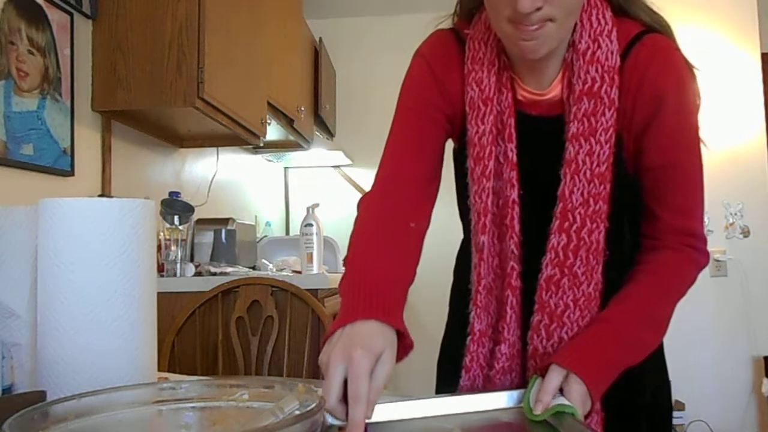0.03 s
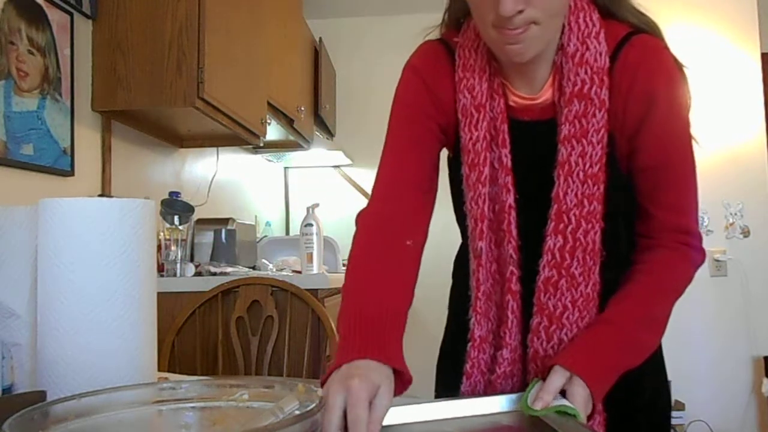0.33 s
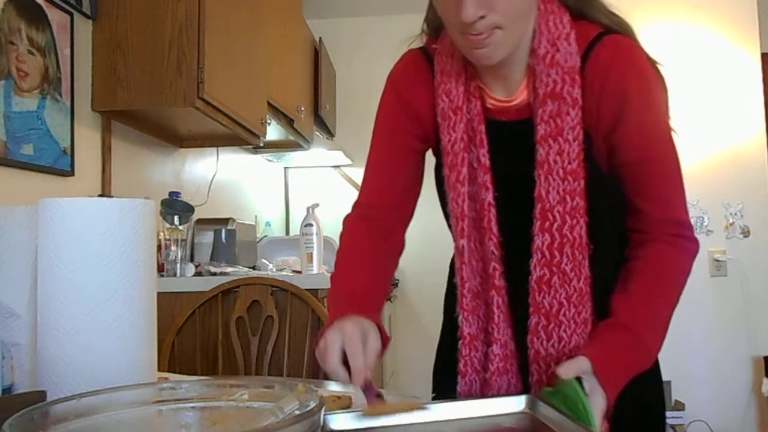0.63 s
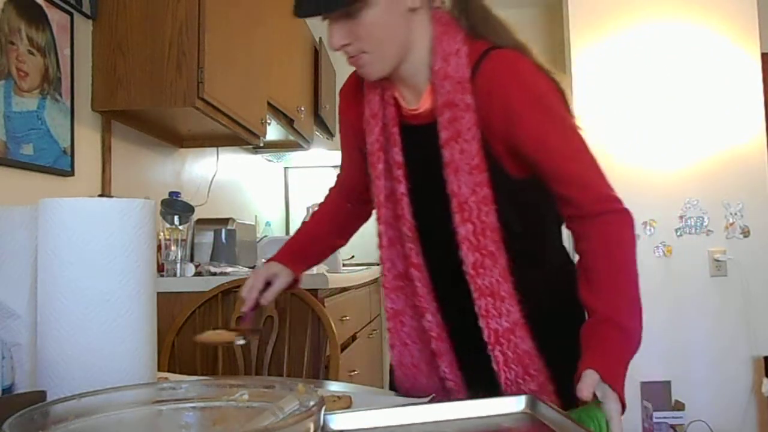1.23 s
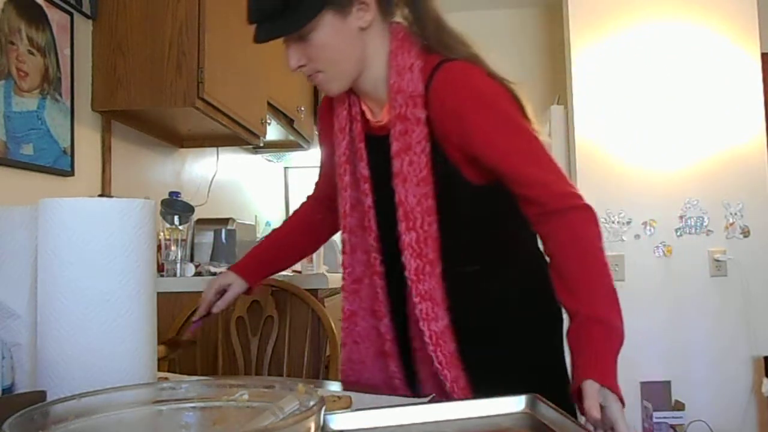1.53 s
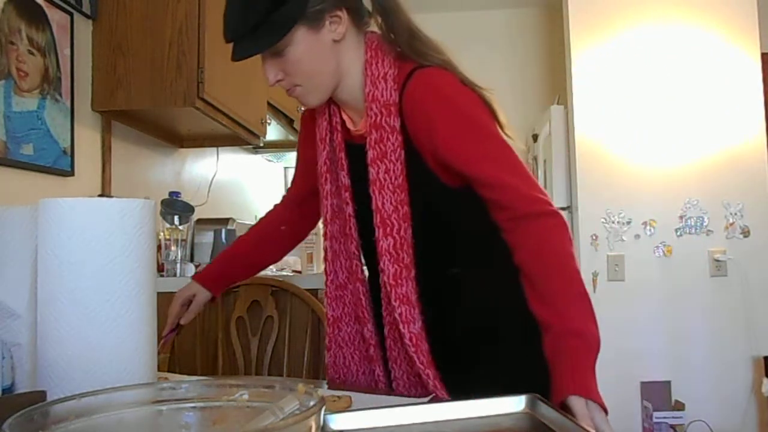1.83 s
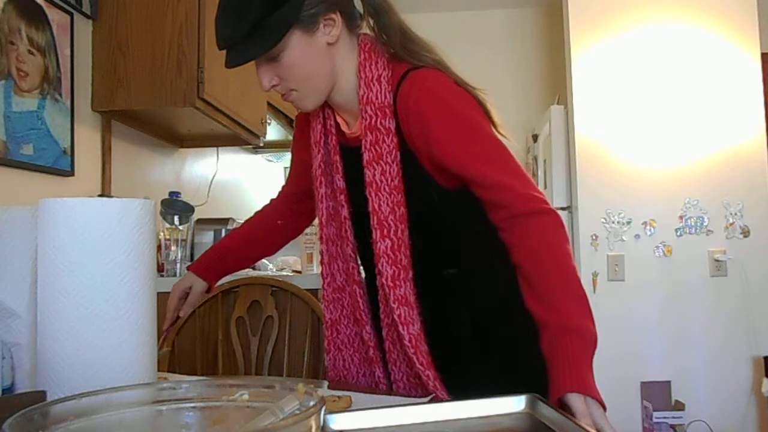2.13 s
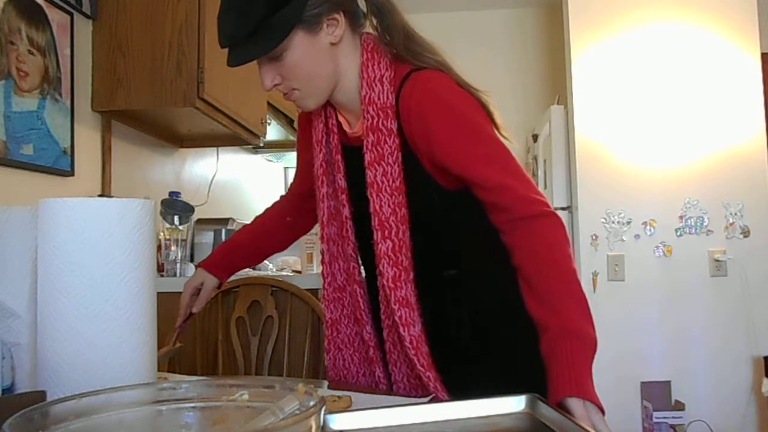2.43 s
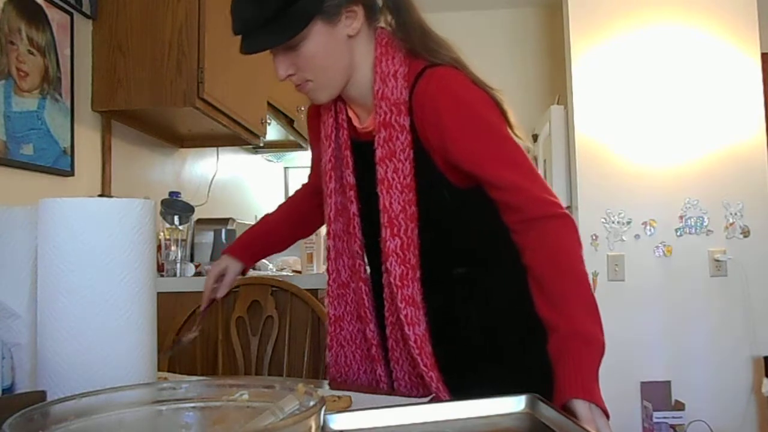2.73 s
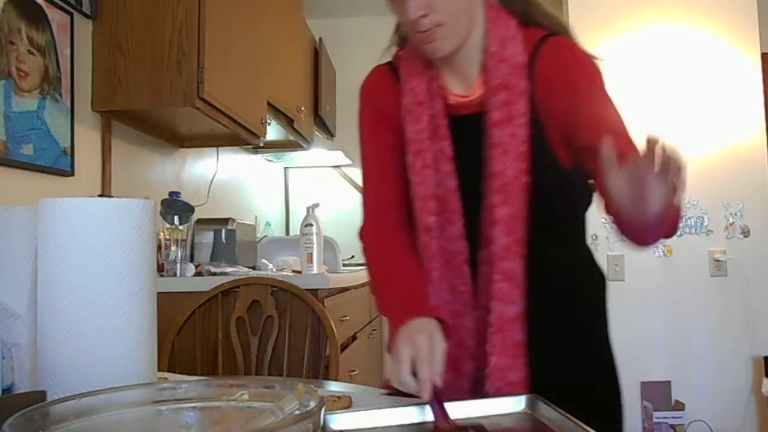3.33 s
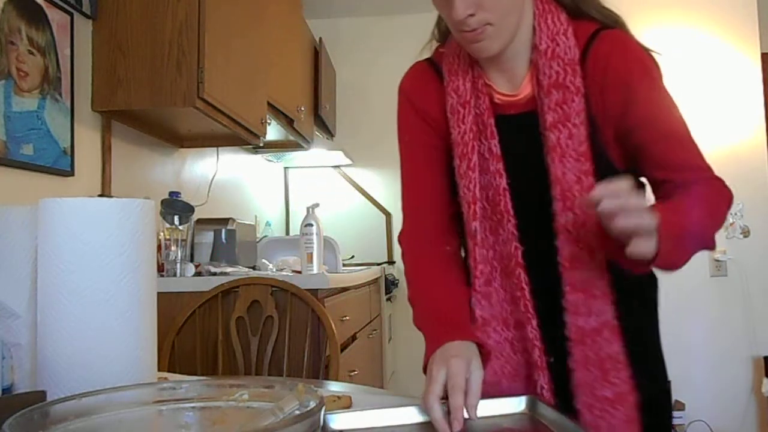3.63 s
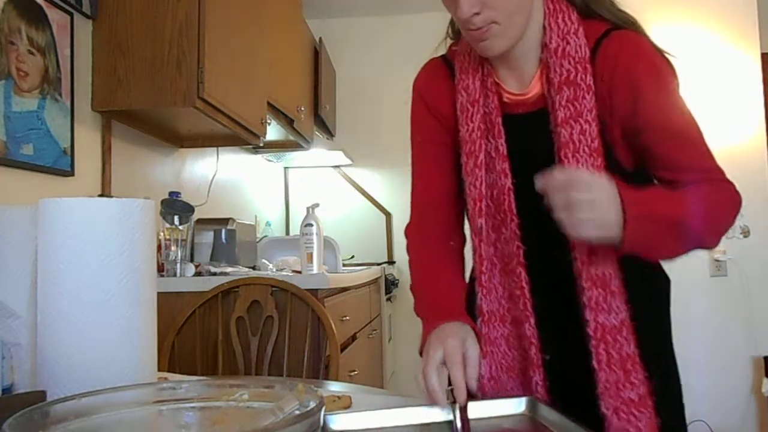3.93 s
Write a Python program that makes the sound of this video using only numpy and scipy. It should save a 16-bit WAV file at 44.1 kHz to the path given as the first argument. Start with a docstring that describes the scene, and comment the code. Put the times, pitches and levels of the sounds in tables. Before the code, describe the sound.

A spatula scrapes softly on a metal baking tray. A cookie slides off faintly and the blade ticks, then the tray bangs, clatters and is scraped again. A fridge hums low in the small kitchen.

```python
"""Spatula on a baking tray

A spatula scrapes under a cookie on a metal tray in tiny stick-slips. A little way off the cookie
slides from the blade, which ticks lightly. Then the spatula bangs down: the tray rings, thumps on
the table, clatters on its rim and is scraped again. The small kitchen rings briefly after each
contact; a fridge hums throughout."""
import sys
import numpy as np
from scipy import signal
from scipy.fft import rfft, irfft
from scipy.io import wavfile
from scipy.ndimage import uniform_filter1d

SR = 44100
rng = np.random.default_rng(int(sys.argv[2]) if len(sys.argv) > 2 else 0)


def waveform_to_disk(signal):
    """Save audio, clipped to [-1, 1], as 16-bit WAV at the path in sys.argv[1]."""
    frames = np.transpose(np.atleast_2d(signal))
    scaled = np.clip(frames, -1, 1) * 32767
    samples = np.round(scaled).astype(np.int16)
    wavfile.write(sys.argv[1], SR, samples)


N = 176400
ROOM_T60_S, SLIPS_PER_S = 0.39, 3500


def undb(db):
    """Decibels to gain."""
    return 10 ** (np.asarray(db) / 20)


def unit(x):
    """Scale to rms 1."""
    return x / np.sqrt(np.mean(x ** 2))


def fade(t60_s):
    """Exponential decay, one second long."""
    return np.exp(-np.log(1000) * np.arange(SR) / SR / t60_s)


def colour(x, points):
    """Minimum-phase filter of unit power through (Hz, dB) points."""
    hz, db = np.array(points).T
    size = 2 * len(x)
    bins_hz = np.maximum(np.arange(len(x) + 1) * SR / size, 1)
    gain = unit(undb(np.interp(np.log(bins_hz), np.log(np.sort(hz)), db)))
    cepstrum = irfft(np.log(gain))
    cepstrum[1:len(x)] *= 2
    cepstrum[len(x) + 1:] = 0
    return irfft(rfft(x, size) * np.exp(rfft(cepstrum)))[:len(x)]


def wander(rate_hz):
    """Smooth random drift, rms 1."""
    hold = int(SR / rate_hz)
    steps = np.repeat(rng.standard_normal(N // hold + 1), hold)
    return unit(uniform_filter1d(uniform_filter1d(steps, hold), hold)[:N])


def envelope(points):
    """Gain along (s, dB) points, silent outside them."""
    times_s, db = np.array(points).T
    return undb(np.interp(np.arange(N) / SR, times_s, db, left=-200, right=-200))


def add(out, start_s, x):
    """Mix x into out."""
    i = int(start_s * SR)
    out[i:i + len(x)] += x[:N - i]


def ring(modes, db_per_octave=0):
    """Decaying modes that start from rest, neighbours opposed; rms 1 at the start."""
    hz, db, t60_s = np.array(modes).T
    gains = undb(db + db_per_octave * np.log2(hz))
    gains /= np.sqrt(np.sum(gains ** 2) / 2)
    t = np.arange(SR) / SR
    return sum((-1) ** k * gain * np.sin(2 * np.pi * hz[k] * t) * fade(t60_s[k])
               for k, gain in enumerate(gains))


def struck_sheet(points, t60_s, crack_db, room_db):
    """Sheet metal's response to a blow: a crack, crowded short modes and the kitchen's tail."""
    crack = undb(crack_db) * fade(0.0097)
    room = undb(room_db) * fade(ROOM_T60_S) * (1 - fade(0.048))
    shape = np.sqrt(fade(t60_s) ** 2 + crack ** 2 + room ** 2)
    return colour(rng.standard_normal(SR) * shape, points)


def slip_response(points, t60_s, direct_db, room_db):
    """One tiny slip: its own click, the metal's short ring and the kitchen's tail."""
    response = rng.standard_normal(SR) * np.hypot(fade(t60_s), undb(room_db) * fade(ROOM_T60_S))
    response[0] += undb(direct_db) * np.sqrt(np.sum(response ** 2))
    return colour(response, points)


def rub(force, body, per_s, spread_db):
    """Random stick-slip clicks, sized by the force, drive a body."""
    clicks = (rng.random(N) < per_s / SR) * rng.choice([-1, 1], N)
    sizes = undb(spread_db * np.clip(rng.standard_normal(N), -2, 2))
    return signal.fftconvolve(unit(clicks * sizes) * force, body / np.sqrt(np.sum(body ** 2)))[:N]


# Fridge and mains tones. Each row: frequency in Hz, rms level in dB, waver as a ratio.
HUM_TONES = [(59, -57.5, 0.38), (163, -69.5, 0.88), (325, -59.5, 0.22), (361.3, -63.5, 0.44),
             (496, -65.5, 1), (726, -72.5, 0.22), (4530, -81.5, .3)]
# Air spectrum. Each row: frequency in Hz, relative level in dB.
AIR_COLOUR = [(10, -15.5), (20, 1), (30, -1), (42, -16.5), (58, -7.5), (76, -14.5), (150, -11.5),
              (190, -16), (228, -4.5), (290, -10.5), (350, -8), (420, -12), (520, -12), (630, -20),
              (850, -19), (1640, -26.5), (2300, -28.5), (2870, -29), (3600, -31), (4500, -31.5),
              (6000, -32.5), (9400, -35), (12400, -40)]


def fridge_and_air():
    """A fridge's wavering hum over a steady rush of air."""
    t = np.arange(N) / SR
    hum = np.zeros(N)
    for hz, db, waver in HUM_TONES:
        drift = 1 + waver * (wander(9) + 1j * wander(9))
        tone = np.real(drift * np.exp(2j * np.pi * hz * t))
        hum += undb(db) * np.sqrt(2 / (1 + 2 * waver ** 2)) * tone
    return hum + undb(-52) * colour(rng.standard_normal(N), AIR_COLOUR)


# Two pushes of the blade. Each row: time in seconds, level in dB.
FIRST_PUSH = [(0, -35), (.03, -40), (.058, -37.5), (.1, -42.5), (.145, -41.5), (.165, -41), (.174, -34.5),
              (.202, -35.5), (.214, -51), (.24, -49), (.262, -40), (.29, -61), (.39, -61.5), (.416, -50),
              (.44, -70)]
SECOND_PUSH = [(3.76, -53), (3.766, -42.5), (3.8, -41), (3.9, -50), (3.94, -45), (3.965, -69), (4, -66)]
# Blade contact spectrum. Each row: frequency in Hz, relative level in dB.
BLADE_COLOUR = [(240, -31), (400, -15), (750, -13.5), (950, -6), (1250, -8.5), (1420, -10), (1800, -7),
                (1980, -0.5), (2700, -2.5), (3600, -0.5), (4200, -3), (4800, -5.5), (6500, -7), (9300, -8),
                (10500, -12.5), (12400, -17)]
# Tray floor resonances. Each row: frequency in Hz, relative level in dB, T60 in seconds.
FLOOR_MODES = [(1190, -8, .3), (1292, -7, .38), (1820, -6, .22), (1991, 3, .22), (2204, -1, .26),
               (3183, -7, .3), (3453, -2, .26), (5211, -5, .17), (6163, -7, .22), (6874, -7, .22),
               (7432, -7, .22), (8410, -5, .2)]


def spatula_scrape():
    """The blade grates over baked crumbs; the tray rings faintly under it."""
    body = slip_response(BLADE_COLOUR, t60_s=0.074, direct_db=-0.5, room_db=-10)
    body += undb(-17) * ring(FLOOR_MODES)
    return rub(envelope(FIRST_PUSH) + envelope(SECOND_PUSH), body, SLIPS_PER_S, spread_db=4.5)


# Cookie friction. Each row: time in seconds, level in dB.
SLIDE_FORCE = [(.95, -72), (1.15, -64), (1.27, -67.5), (1.4, -80)]
# Slide spectrum. Each row: frequency in Hz, relative level in dB.
SLIDE_COLOUR = [(1000, -25), (2300, -8), (2950, 5), (3700, -9), (4400, 4), (4900, -12), (5800, -1),
                (9500, -17)]


def cookie_slide():
    """The cookie slips off the blade, farther away."""
    body = slip_response(SLIDE_COLOUR, t60_s=0.1, direct_db=-7, room_db=-6)
    return rub(envelope(SLIDE_FORCE), body, SLIPS_PER_S, spread_db=6)


# Blade taps. Each row: start in seconds, level in dB, tilt in dB per octave.
TICKS = [(1.93, -63, 1), (2.445, -60.5, 5), (2.508, -57.5, 0), (2.661, -54, 2)]
# Blade resonances. Each row: frequency in Hz, relative level in dB, T60 in seconds.
BLADE_MODES = [(2830, 6, .25), (3700, -3, .3), (4570, -1, .3), (4930, -3, .2), (6155, -7, .45),
               (6930, -4, .2), (7130, -5, .25), (7680, -13, .7), (9150, -10, .2)]


def blade_ticks():
    """Light contacts set the blade ringing."""
    out = np.zeros(N)
    for start_s, db, db_per_octave in TICKS:
        contact = undb(-3) * struck_sheet(BLADE_COLOUR, t60_s=0.1, crack_db=0, room_db=-10)
        add(out, start_s, undb(db) * (contact + ring(BLADE_MODES, db_per_octave)))
    return out


# Blows on the tray floor. Each row: start in seconds, level in dB.
BANGS = [(3.5507, -22.5), (3.5515, -18), (3.5575, -23.5)]
# Bang spectrum. Each row: frequency in Hz, relative level in dB.
BANG_COLOUR = [(80, -23), (130, -6), (240, -4.5), (360, -13), (520, -11), (780, -6), (1000, -10.5),
               (1250, -5), (1400, -11), (1600, -4.5), (1750, -13), (2020, 1.5), (2650, -6.5), (3150, 0),
               (3800, -4.5), (4600, -2.5), (5200, -6), (6500, -6), (8700, -6.5), (10300, -11), (12400, -18)]
# Tray-on-table resonances. Each row: frequency in Hz, relative level in dB, T60 in seconds.
THUMP_MODES = [(132.6, 0.5, 0.58), (151.4, -3, 0.18), (195, -9.5, 0.12), (223.5, 0, 0.17), (253.4, 1, 0.24),
               (318, -14, 0.39)]


def tray_bang():
    """Blade and tray land in quick contacts; the tray thumps on the table."""
    out = np.zeros(N)
    for start_s, db in BANGS:
        add(out, start_s, undb(db) * struck_sheet(BANG_COLOUR, t60_s=0.12, crack_db=3, room_db=-5))
    add(out, BANGS[0][0], undb(-21.5) * ring(FLOOR_MODES) + undb(-30.5) * ring(THUMP_MODES))
    return out


# Rim blows. Each row: start in seconds, level in dB.
KNOCKS = [(3.76, -40.5), (3.7817, -17.5), (3.787, -29.5), (3.8144, -19), (3.828, -28.5), (3.837, -29.5),
          (3.8586, -33), (3.891, -34.5)]
# Rattle between blows. Each row: time in seconds, level in dB.
CHATTER = [(3.82, -39), (3.837, -28), (3.85, -31.5), (3.88, -38), (3.91, -34), (3.942, -35.5), (3.957, -58)]
# Rim spectrum. Each row: frequency in Hz, relative level in dB.
RIM_COLOUR = [(120, -38), (300, -32), (550, -12.5), (750, -15), (850, -5.5), (1030, -11), (1170, 0),
              (1350, 1), (1620, -13), (1780, -1), (1980, 1), (2250, -14), (2540, -12.5), (2900, -1),
              (3330, -15), (3850, -2), (4350, -9), (4620, -5.5), (5000, -10.5), (5700, -9), (6400, -19),
              (6800, -2.5), (7400, -14), (8400, -7.5), (9300, -15), (10000, -23), (12400, -28)]
# Rim resonances. Each row: frequency in Hz, relative level in dB, T60 in seconds.
RIM_MODES = [(856, -7, .38), (945, -8, .45), (1163, -3, .38), (1254, -5, .25), (1285, -4, .3),
             (1919, -2, .26), (2428, -6, .35), (2896, -8, .3), (3847, -1, .27), (4211, -4, .2),
             (4558, 3, .2), (6907, -3, .27), (8114, -2.5, .2), (8403, -2, .2), (8640, -2.5, .18)]


def rim_clatter():
    """The rim knocks, rocks the table, bounces and chatters to rest."""
    out = np.zeros(N)
    rim = ring(RIM_MODES)
    for start_s, db in KNOCKS:
        contact = struck_sheet(RIM_COLOUR, t60_s=0.08, crack_db=0.5, room_db=-16.5)
        add(out, start_s, undb(db) * (contact + undb(-8) * rim))
    thump = ring(THUMP_MODES, db_per_octave=-22) * fade(0.71)
    add(out, KNOCKS[1][0], undb(-38.5) * thump)
    body = slip_response(RIM_COLOUR, t60_s=0.11, direct_db=-1.5, room_db=-15) + undb(-5.5) * rim
    return out + rub(envelope(CHATTER), body, per_s=1100, spread_db=4)


def scene():
    """All sources, mixed to mono."""
    mix = fridge_and_air() + spatula_scrape() + cookie_slide() + blade_ticks()
    return (mix + tray_bang() + rim_clatter())[None]


def record(dry):
    """A shelf dulls the top treble; a steep low-pass cuts it off."""
    shelf_hz, shelf_db, cutoff_hz = [10370, 10920], [0, -14.5], 12250
    bins_hz = np.arange(N + 1) * SR / (2 * N)
    shelf = undb(np.interp(bins_hz, shelf_hz, shelf_db))
    dull = irfft(rfft(dry, 2 * N) * shelf)[:, :N]
    return signal.sosfilt(signal.ellip(10, .1, 80, cutoff_hz, fs=SR, output="sos"), dull)


dry = scene()
out = record(dry)
waveform_to_disk(out)
```